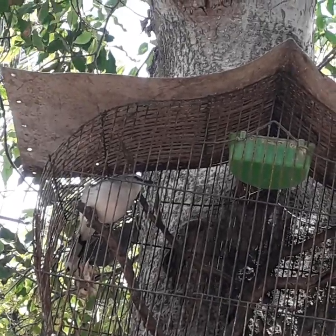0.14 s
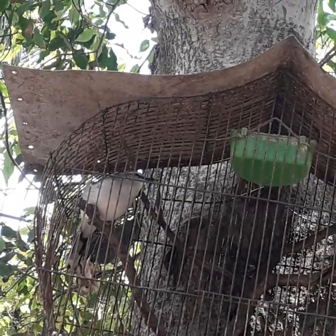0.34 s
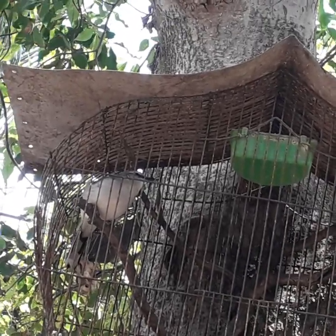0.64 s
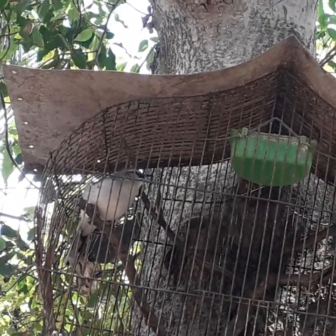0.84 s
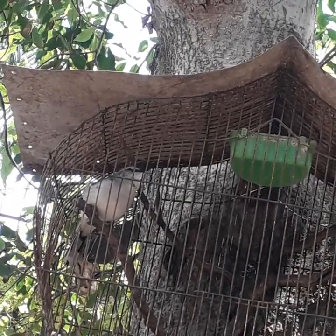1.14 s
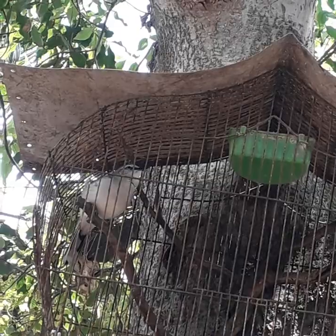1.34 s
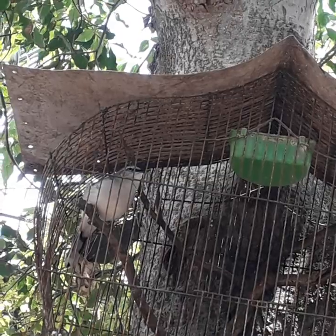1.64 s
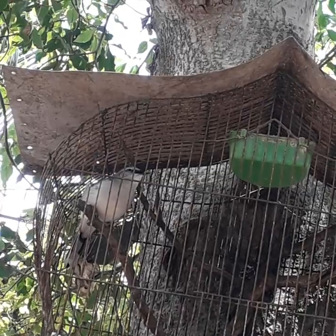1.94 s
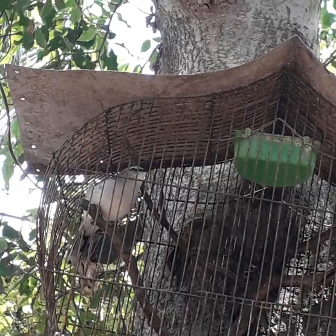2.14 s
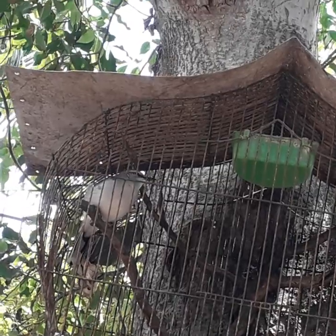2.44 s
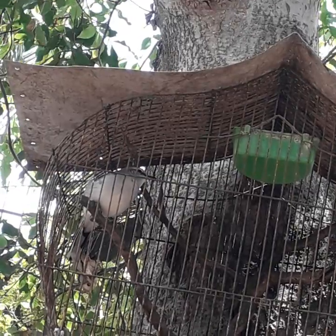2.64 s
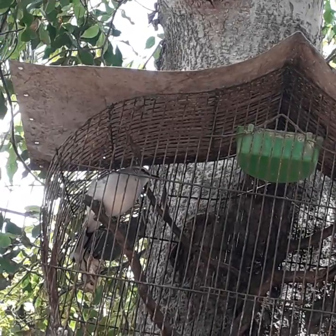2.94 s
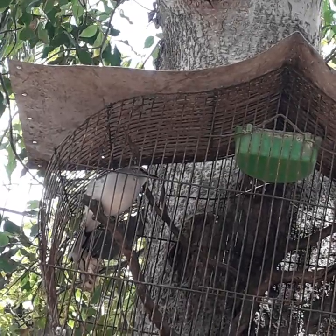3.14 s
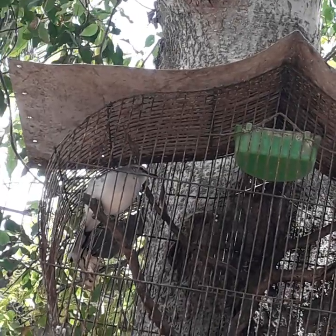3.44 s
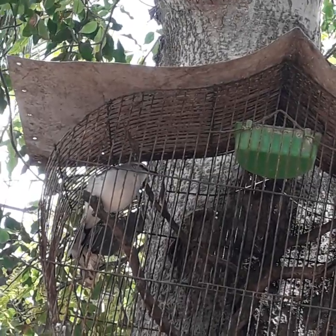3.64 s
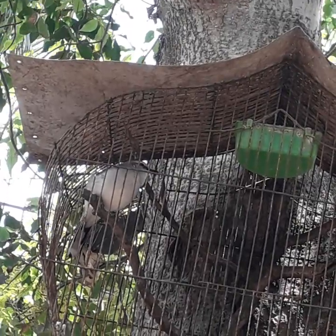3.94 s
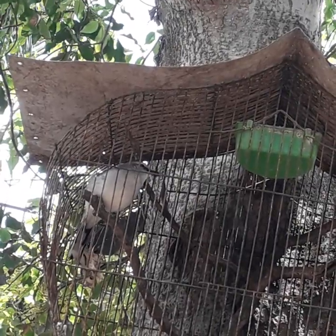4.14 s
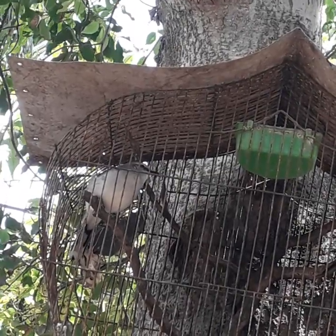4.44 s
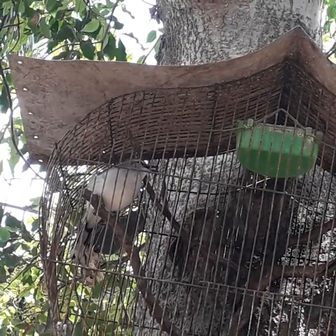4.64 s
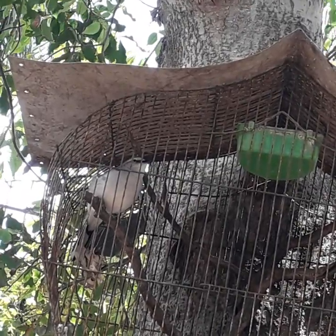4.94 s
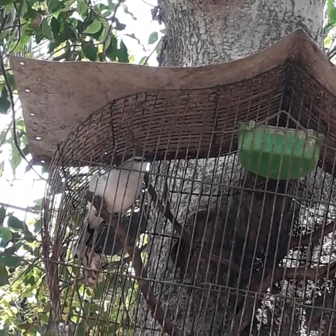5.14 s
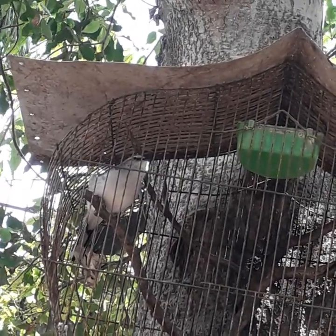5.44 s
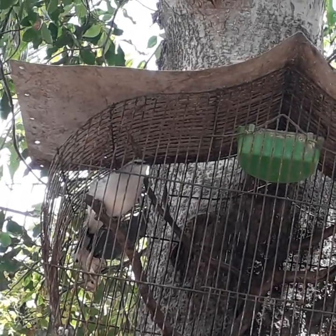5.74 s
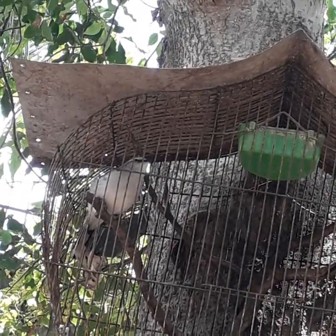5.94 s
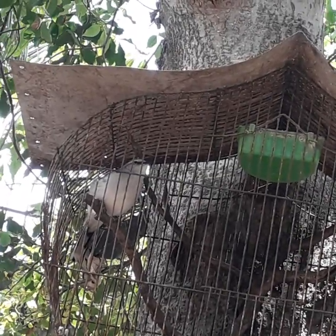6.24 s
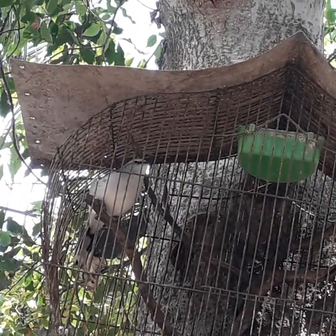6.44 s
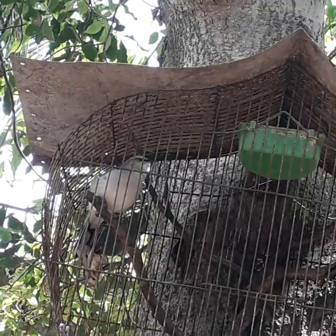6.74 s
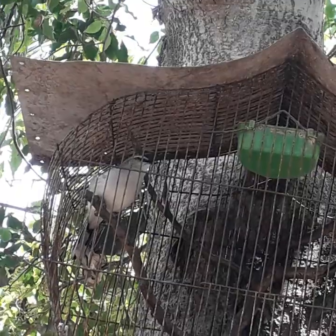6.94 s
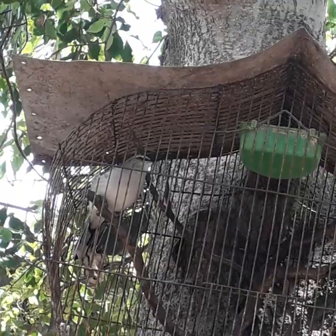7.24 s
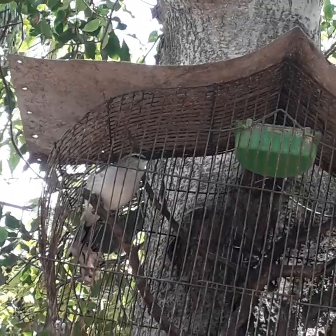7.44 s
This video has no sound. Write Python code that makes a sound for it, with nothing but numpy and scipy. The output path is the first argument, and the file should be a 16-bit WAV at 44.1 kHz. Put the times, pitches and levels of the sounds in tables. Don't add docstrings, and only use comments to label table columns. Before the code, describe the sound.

Outdoors, a songbird whistles and chips rapidly, rasps, trills upward and warbles over faint traffic rumble and distant fowl.

```python
import sys
import numpy as np
from scipy import signal
from scipy.fft import rfft, irfft, next_fast_len
from scipy.io import wavfile
from scipy.ndimage import map_coordinates

SR = 44100
rng = np.random.default_rng(int(sys.argv[2]) if len(sys.argv) > 2 else 0)


def log_audio(samples):
    frames = np.atleast_2d(samples).T
    limited = np.clip(frames, -1, 1)
    pcm = np.round(limited * 32767).astype(np.int16)
    wavfile.write(sys.argv[1], SR, pcm)


def volts_from_decibels(level):
    exponent = np.asarray(level, float) / 20
    return 10 ** exponent


N = 333837


def unit(x):
    return x / np.sqrt(np.mean(x ** 2) + 1e-20)


def along(points, hz):
    f, v = np.transpose(points)
    return np.interp(np.log(hz + 1), np.log(f + 1), v)


def filtered(x, response):
    m = next_fast_len(len(x) + 8192)
    return irfft(rfft(x, m) * response(np.fft.rfftfreq(m, 1 / SR)), m)[:len(x)]


def coloured_noise(n, colour):
    return unit(filtered(rng.standard_normal(n), lambda f: volts_from_decibels(along(colour, f))))


def wobble(n, rate_hz):
    return map_coordinates(rng.standard_normal(2000), [np.arange(n) * rate_hz / SR % 1990])


def controls(rows):
    s, *cols = np.transpose(rows)
    t = np.arange(s[0], s[-1], 1 / SR)
    to_nearest_end = np.minimum(t - s[0], s[-1] - t)
    edge = np.sin(np.pi / 2 * np.clip(to_nearest_end / 0.004, 0, 1)) ** 2
    return round(s[0] * SR), edge, [np.interp(t, s, c) for c in cols]


def shaped(shape, s, length, hz, db, *rate):
    return [(s + u * length, hz * ratio, db + rel, *rate, *swing) for u, ratio, rel, *swing in shape]


def add(track, start, x, wet_db, gap_s=0.008):
    # hz, t60_s
    echo_times = [(1000, 0.82), (2500, 0.40046), (4500, 0.45), (9000, 0.33)]
    # hz, level_db
    straight_path = [(2000, -4.5), (3000, -1), (4200, -7.5), (8000, -8)]
    hz, t, z = signal.stft(rng.standard_normal(SR // 3), SR, nperseg=256)
    fading = z * volts_from_decibels(-60 * t / along(echo_times, hz)[:, None])
    tail = signal.istft(fading, SR, nperseg=256)[1]
    age = np.arange(len(tail)) / SR
    tail *= np.clip(age / gap_s - 0.5, 0, 1)
    tail *= 1 + volts_from_decibels(8.5 - 60 * age / 0.093)
    heard = signal.fftconvolve(x, tail * volts_from_decibels(wet_db) / np.linalg.norm(tail))
    heard[:len(x)] += filtered(x, lambda f: volts_from_decibels(along(straight_path, f)))
    track[start:][:len(heard)] += heard[:N - start]


def song():
    out = np.zeros(N)
    for rows in whistles() + slides() + peeps():
        start, edge, (hz, db) = controls(rows)
        waver = 1 + wobble(len(hz), 118.0) / 100
        tone = syrinx(hz * waver, db + 3 * wobble(len(hz), 82), breath_db=-37)
        add(out, start, edge * tone, wet_db=-3.0)
    throbbing(out, chips(), uneven=0.22, depth_db=20.5, wet_db=-6.5)
    throbbing(out, trills() + warbles(), uneven=0.1205, depth_db=57.5, wet_db=-3.5)
    return out


def syrinx(pitch, level_db, breath_db):
    # hz, db_under_the_fundamental
    overtones = [(3500, -45), (5500, -38), (7000, -29.5), (8500, -25.5), (10000, -26.5), (13000, -19.5)]
    n = len(pitch)
    phase = 2 * np.pi * np.cumsum(pitch) / SR
    tone = np.sin(phase)
    for k in (2, 3):
        strength_db = along(overtones, k * pitch) - 10 * (k - 2)
        strength_db += 0.3 * (level_db + 15) + 3 * wobble(n, 300)
        tone += volts_from_decibels(strength_db) * np.sin(k * phase)
    breath = volts_from_decibels(breath_db) * rng.standard_normal(n)
    return volts_from_decibels(level_db) * (np.sqrt(2) * tone + breath)


def throbbing(out, notes, uneven, depth_db, wet_db):
    for rows in notes:
        start, edge, (hz, db, rate, swing) = controls(rows)
        n = len(hz)
        turn = 2 * np.pi * np.cumsum(rate * (1 + uneven * wobble(n, 40.092))) / SR
        sweep = -np.cos(turn) - 0.21 * np.cos(2 * turn) - 0.32 * np.sin(2 * turn)
        sweep *= 1 + uneven * wobble(n, 99.8)
        swell = -np.cos(turn + 0.65) - 0.35 * np.cos(2 * turn + 1.3)
        swell_db = depth_db * swing * swell + wobble(n, 80)
        tone = syrinx(hz * (1 + swing * sweep), db + swell_db, breath_db=-36.0)
        add(out, start, edge * tone, wet_db)


def whistles():
    # start_s, pitch_hz, level_db
    opening = [
        (.805, 1480, -38),
        (.812, 2264, -30.5),
        (.826, 2148, -32),
        (.85, 2398, -20.5),
        (.885, 2504, -20),
        (.9, 2440, -29.5),
    ]
    # share_of_length, pitch_ratio, level_db
    low_step = [(0, .77, -4), (.32, .95, -3.5), (1, 1.03, 0)]
    # share_of_length, pitch_ratio, level_db
    high_step = [(0, .89, -3), (.14, .94, 1), (.35, .99, -5.5), (.65, 1.01, -10.5), (1, .99, -24)]
    # start_s, length_s, pitch_hz, level_db
    lows = [(1.002, .043, 2180, -24), (1.178, .05, 2100, -27), (1.388, 0.045, 2121, -24.5),
            (1.865, 0.049, 2040, -29.5)]
    # start_s, length_s, pitch_hz, level_db
    highs = [(1.046, .051, 2640, -14.5), (1.232, .053, 2662, -16), (1.433, .057, 2723, -15.5),
             (1.664, 0.073633, 2584, -15), (1.919, 0.06226, 2569, -18)]
    low_notes = [shaped(low_step, *row) for row in lows]
    return [opening] + low_notes + [shaped(high_step, *row) for row in highs]


def slides():
    # start_s, length_s, from_hz, to_hz, level_db
    slide_list = [
        (.797, 0.0127, 2500, 2996, -44),
        (0.984, 0.018, 2570, 3025, -34.5),
        (1.407, 0.027, 3549, 2860, -42.5),
        (1.621, .037, 1777, 1620, -37.5),
        (1.717, .012, 3500, 3260, -20.5),
    ]
    return [[(s, from_hz, db), (s + length, to_hz, db)] for s, length, from_hz, to_hz, db in slide_list]


def peeps():
    # start_s, peak_db, pitch_hz
    peep_list = [(0.9278, -33.5, 3624), (0.9593, -28.5, 3415), (1.0036, -37, 3384), (1.1094, -39, 3429),
                 (1.1403, -34.5, 3220), (1.1788, -26.5, 3330), (1.2203, -33, 3400), (1.2793, -29, 3488),
                 (1.299, -30, 3440), (1.359, -34.5, 3250), (1.39, -37, 3600), (1.4165, -50, 3201),
                 (1.487, -36, 3290), (1.5276, -38.5, 3476), (1.6215, -29, 3330), (1.6905, -47, 3390)]
    return [[(s, hz * 0.96, db - 7.5), (s + 0.013, hz * 0.998, db - 5.5)] for s, db, hz in peep_list]


def chips():
    # share_of_length_from_landing, pitch_ratio, level_db, pitch_swing_share
    chip_shape = [(-.2, 1.64, -39.5, .02), (-.08, 1.38, -24, 0.037), (0, 1.1, -5, .05),
                  (.33, 1, -0.5, .045), (.65, .98, -9, 0.049), (1, .93, -20, 0.075)]
    # landing_s, length_s, pitch_hz, peak_db, throb_rate_hz
    chip_list = [(.914, 0.06232, 4430, -11, 135.3), (1.111, 0.045, 4320, -5.5, 139.6),
                 (1.297, .045, 4180, -5.5, 140.6), (1.509, 0.033, 4107, -9, 139.4),
                 (1.996, 0.04, 4083, -11, 142.7)]
    # start_s, pitch_hz, level_db, pitch_swing_share
    churr_rows = [
        (1.732, 6840, -48.5, .01),
        (1.737, 5310, -26.5, 0.043),
        (1.741, 4190, -8.5, .03),
        (1.76, 3600, -19.5, .067),
        (1.79, 3560, -34, 0.069),
        (1.815, 3500, -41, 0.25),
        (1.835, 3320, -23.5, .092),
        (1.88, 3490, -38, .17),
    ]
    # start_s, pitch_hz, level_db, throb_rate_hz, pitch_swing_share
    cut_chip = [
        (0, 3684, -28.5, 141, 0.11),
        (.02, 3730, -35, 139.5, 0.13),
    ]
    churr_throb_hz = 85.675
    churr = [(s, hz, db, churr_throb_hz, swing) for s, hz, db, swing in churr_rows]
    return [cut_chip, churr] + [shaped(chip_shape, *row) for row in chip_list]


def trills():
    # share_of_length, pitch_ratio, level_db, pitch_swing_share
    burr_shape = [(0, 1.03, -25.5, 0.078), (.52, 1, 0, 0.088), (1, 1.08, -1.5, .1)]
    # start_s, length_s, pitch_hz, level_db, throb_rate_hz
    burr_list = [(3.856, 0.0792, 2458, -24, 82.04), (4.06, 0.074, 2527, -19, 82),
                 (4.295, .1, 2497, -20, 66), (4.538, .09, 2508, -20, 56.1), (4.81, .08, 2445, -21, 73.95)]
    # share_of_length, share_of_way_to_top, level_db, pitch_swing_share
    climb_shape = [(0, 0.029, -2, .06), (.27, .62, -4, 0.0882), (.55, .86, -6, .07), (1, 1, -18.5, .08)]
    # hold_s, length_s, top_hz, level_db
    climb_list = [(.028, .065, 4130, -17), (.006, .066, 4400, -17), (.004, .103, 4850, -18),
                  (.003, .1, 4500, -18.5)]
    # start_s, pitch_hz, level_db, throb_rate_hz, pitch_swing_share
    first_climb = [
        (3.97, 3180, -27, 86.6, .1),
        (4.02, 3456, -39, 86.32, .11),
    ]
    jump_s, jump_hz, climb_throb_hz = 0.013, 3420.2, 78.2
    first, *burrs = [shaped(burr_shape, *row) for row in burr_list]
    notes = [first + first_climb]
    for burr, (hold, length, top_hz, db) in zip(burrs, climb_list):
        landed = burr[-1][0] + jump_s
        climb = []
        for u, way, rel, swing in climb_shape:
            hz = jump_hz + way * (top_hz - jump_hz)
            climb.append((landed + hold + u * length, hz, db + rel, climb_throb_hz, swing))
        notes.append(burr + [(landed, *climb[0][1:])] + climb)
    return notes


def warbles():
    # start_s, pitch_hz, level_db
    swoops = [
        [(5.312, 2914, -54), (5.34, 2600, -26), (5.39, 2239, -18.5), (5.45, 1920, -27.5), (5.52, 1975, -32),
         (5.57, 2312, -19.5), (5.62, 2523, -16), (5.64, 3180, -19), (5.72, 3480, -29.5)],
        [(6.653, 3300, -52), (6.69, 2648, -19), (6.73, 2354, -18), (6.8, 1870, -35), (6.86, 2383, -21),
         (6.925, 2806, -19), (6.96, 3430, -22), (6.99, 3756, -17), (7.045, 3814, -31)],
        [(7.428, 3680, -68), (7.446, 2840, -29), (7.46, 2752, -15), (7.49, 2244, -20.5), (7.57, 1843, -32)],
    ]

    def swing(age_s, db):
        widest = np.clip(0.031 - 0.04 * (db + 15), 0, 0.068)
        return widest * min(age_s / 0.06, 1)

    def throb_hz(hz):
        return 54 + 7.5 * hz / 1000

    return [[(s, hz, db, throb_hz(hz), swing(s - note[0][0], db)) for s, hz, db in note]
            for note in swoops]


def rasps():
    # start_s, pitch_hz, level_db, noise_share, gape_db
    calls = [
        [(3.077, 1106, -25.5, 0.4, -5), (3.09, 1069, -25.5, 0.9, -7), (3.105, 1101, -29.5, 1, 2.5),
         (3.135, 1147, -37.5, 0.6, -0.5)],
        [(3.415, 869, -43, 0.3, 8), (3.445, 922, -33, 0.4, 7), (3.5, 1101, -35.5, 0.4, 4)],
        [(3.49, 409.2, -39, 0.1, 6), (3.53, 422.3, -33.5, 0.4, 6.5), (3.572, 400, -47, .5, -2.5)],
    ]
    # hz, width_hz, level_db
    throat = [(2179.8, 573, 6), (1230, 250, -3), (3300, 860, 11.5), (4210, 810, 2)]

    def mode(f, c, w, db):
        return volts_from_decibels(db) * 1j * (f * w / (c * c - f * f + 1j * f * w)) ** 2

    out = np.zeros(N)
    for rows in calls:
        start, edge, (hz, db, share, gape_db) = controls(rows)
        n = len(hz)
        cycle = np.cumsum(hz * (1 + 0.012 * wobble(n, 300))) / SR
        pulses = unit(np.diff(np.floor(cycle), prepend=0))
        noise = unit(rng.standard_normal(n) * (1 + 1.4 * np.cos(2 * np.pi * cycle)))
        share = np.clip(share, 0, 1)
        source = np.sqrt(1 - share) * pulses + np.sqrt(share) * noise
        voice = filtered(source, lambda f: sum(mode(f, *m) for m in throat[2:]))
        voice -= volts_from_decibels(gape_db) * filtered(source, lambda f: sum(mode(f, *m) for m in throat[:2]))
        add(out, start, unit(voice) * edge * volts_from_decibels(db + 2 * wobble(n, 110)), wet_db=-4.0)
    return out


def rustle():
    # start_s, level_db
    brush = [
        (4.02, -57),
        (4.045, -41.5),
        (4.12, -38.5),
        (4.2, -36.5),
        (4.27, -55),
    ]
    # hz, level_db
    feather_colour = [(800, -35), (1500, -2), (4500, 6), (5900, 12.5), (7000, 1), (8000, 0), (16000, -14.5)]
    out = np.zeros(N)
    start, edge, (db,) = controls(brush)
    hiss = coloured_noise(len(db), feather_colour)
    add(out, start, hiss * edge * volts_from_decibels(db - 4.5 + 4.6 * wobble(len(db), 60)), wet_db=-2.5)
    return out


def far_calls():
    # start_s, length_s, pitch_hz, level_db, spread_hz
    fowl = [(2, 0.5688, 890, -52, 160), (2.15, 0.41, 1400, -50, 1100), (5.575, .13, 825, -44.5, 30),
            (6.1, 0.11, 1665, -49.5, 30), (6.27, .16, 1655, -55, 30), (6.25, .6, 968, -57, 9),
            (6.78, .3, 1010, -56, 90.5), (7.05, .5, 950, -61, 120), (6.54, .28, 3800, -58, 35),
            (7.45, 0.20102, 577, -56.5, 60.18)]
    # share_of_length, pitch_ratio, level_db
    call_shape = [(0, 1.005, -2.5), (.5, 1, -0.5), (1, .99, -2)]
    clear_hz = 40
    out = np.zeros(N)
    for *row, blur_hz in fowl:
        start, edge, (hz, db) = controls(shaped(call_shape, *row))
        n = len(hz)
        phase = 2 * np.pi * np.cumsum(hz) / SR
        core = 1.4 * clear_hz / (clear_hz + blur_hz)
        fade = core + wobble(n, blur_hz) + 1j * wobble(n, blur_hz)
        tone = fade * np.exp(1j * phase) + fade * np.exp(2j * phase) / 10
        add(out, start, tone.real * edge * volts_from_decibels(db), wet_db=-5.5)
    return out


def thump():
    # start_s, pitch_hz, peak_db, t60_s
    knock = (3, 170, -32, 0.0042)
    s, hz, db, t60 = knock
    t = np.clip(np.arange(N) / SR - s, 0, None)
    return volts_from_decibels(db - 60 * t / t60) * np.sin(2 * np.pi * hz * t) * (1 - np.exp(-t / 0.002))


def yard():
    # start_s, engines_db, road_db, hiss_db
    loudness = [(0, -48, -41, -50.5), (.1, -45.5, -41.5, -53.5), (.7, -45.5, -42, -56),
                (1.05, -47.5, -43.5, -53.5), (1.65, -47.5, -46.5, -54.5), (2.15, -52, -43.5, -53.5),
                (3.05, -44, -47.5, -53), (3.2, -43.5, -44, -53), (3.35, -52, -49.5, -53),
                (3.55, -44, -49, -52), (3.88, -49, -49, -55), (4.15, -45, -49, -54), (4.4, -49, -47.5, -57),
                (5.4, -53, -50.5, -53), (6.2, -54.5, -47.5, -53.5), (7.25, -53.5, -52.5, -54),
                (7.57, -51, -52, -53)]
    # hz, db_per_hz
    drone_colour = [(15, -52.5), (25, -25), (45, -9), (81, -5), (108, 1.5), (140, -0.5), (180, -33.5),
                    (310, -120)]
    # hz, db_per_hz
    rumble_colour = [(82, -37.5), (140, 1), (214, 0.5), (296, -8), (371, -8.5), (600, -22), (780, -46.5),
                     (1320, -120)]
    # hz, db_per_hz
    hiss_colour = [(240, -25), (400, -5), (587, -7), (990, -5.5), (1070, -8), (1170, -8), (1670, -5.5),
                   (2040, -5), (2240, -5.5), (3330, -10), (4670, -8.5), (7640, -18), (10500, -37),
                   (12900, -32), (15700, -34)]
    s, *levels = np.transpose(loudness)
    drone_db, rumble_db, hiss_db = (np.interp(np.arange(N) / SR, s, db) for db in levels)
    drone = coloured_noise(N, drone_colour) * volts_from_decibels(drone_db + 1.5 * wobble(N, 5))
    rumble = coloured_noise(N, rumble_colour) * volts_from_decibels(rumble_db + 1.7 * wobble(N, 5))
    hiss = coloured_noise(N, hiss_colour) * volts_from_decibels(hiss_db + 7.5 + wobble(N, 3.72) / 2)
    return drone + rumble + hiss


def scene():
    # hz, level_db
    microphone = [(100, 11), (5000, 0.5), (6500, 5), (8200, 6.5), (9200, -8), (10200, -26.5), (12500, -5.5),
                  (15500, -13)]
    calls = song() + rasps() + rustle() + far_calls()
    return (filtered(calls, lambda f: volts_from_decibels(along(microphone, f))) + yard() + thump())[None]


def low_pass(x):
    return signal.sosfilt(signal.butter(12, 15880, fs=SR, output="sos"), x)


def record(dry):
    # from_hz, to_hz, shift_hz, level_db
    copies = [(1600, 3100, 12700, -50), (3080, 5300, 7000, -49.5)]
    mix, t = dry[0], np.arange(N) / SR
    for lo_hz, hi_hz, shift_hz, db in copies:
        band = filtered(dry[0], lambda f: (f > lo_hz) & (f < hi_hz))
        band = signal.hilbert(band, next_fast_len(N))[:N]
        mix = mix + volts_from_decibels(db) * (band * np.exp(2j * np.pi * shift_hz * t)).real
    return low_pass(mix[None])


dry = scene()
out = record(dry)
log_audio(out)
```